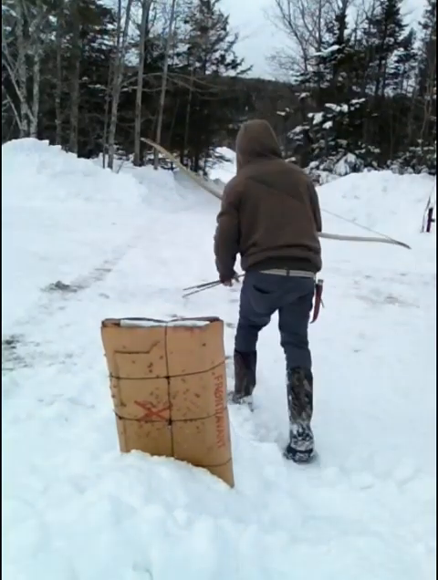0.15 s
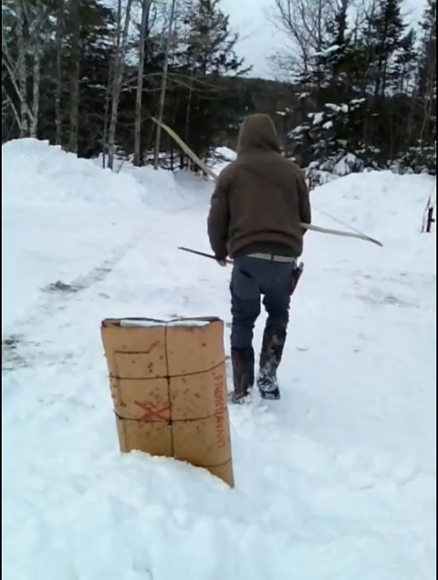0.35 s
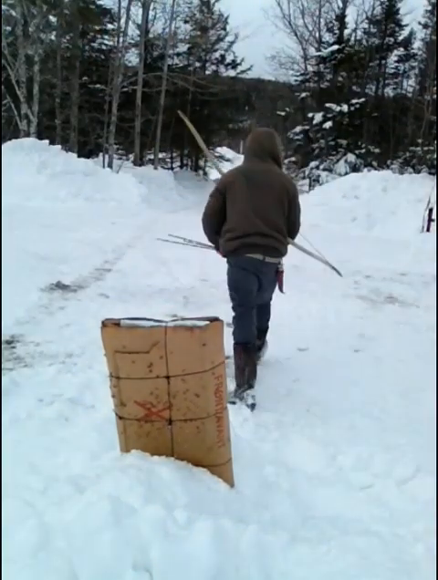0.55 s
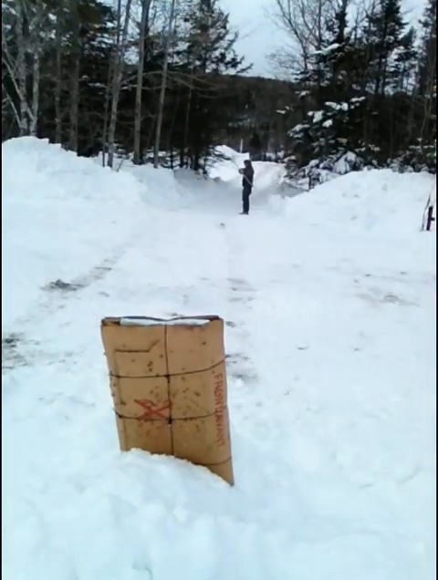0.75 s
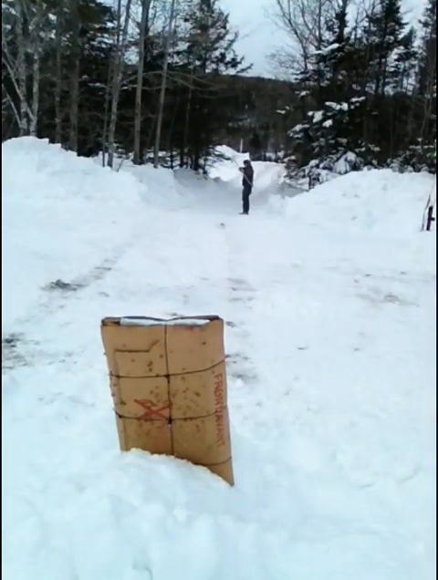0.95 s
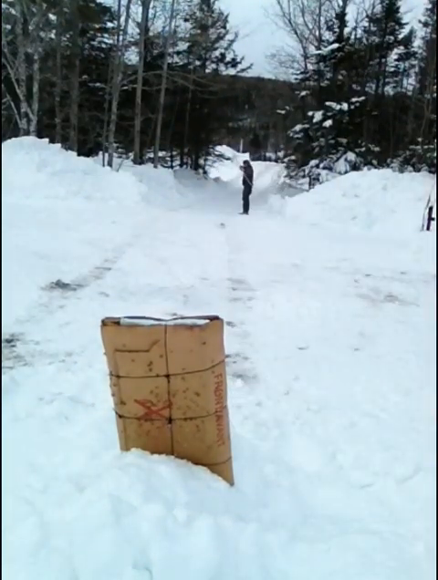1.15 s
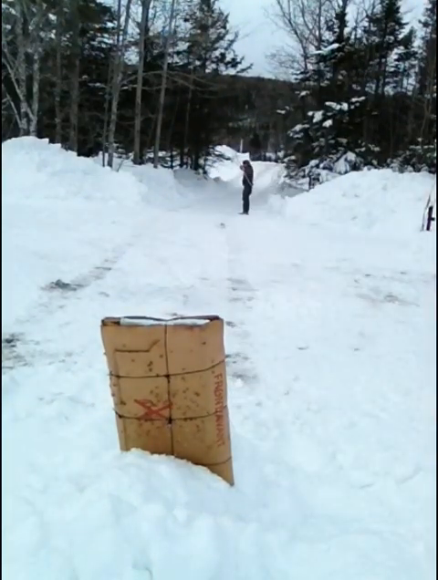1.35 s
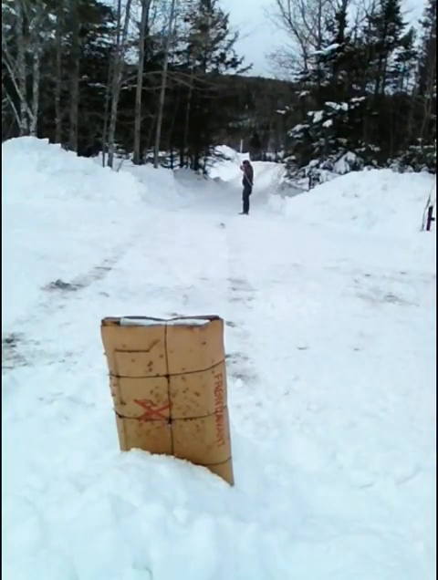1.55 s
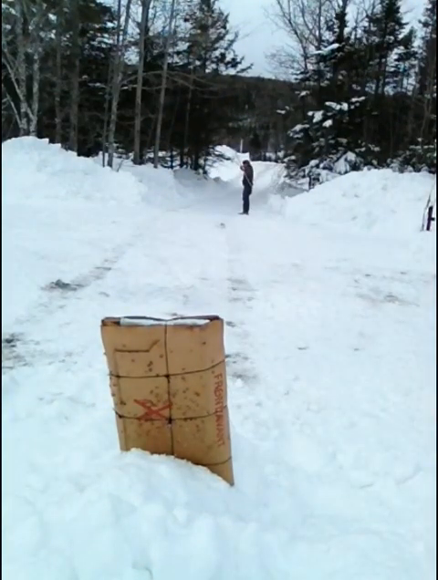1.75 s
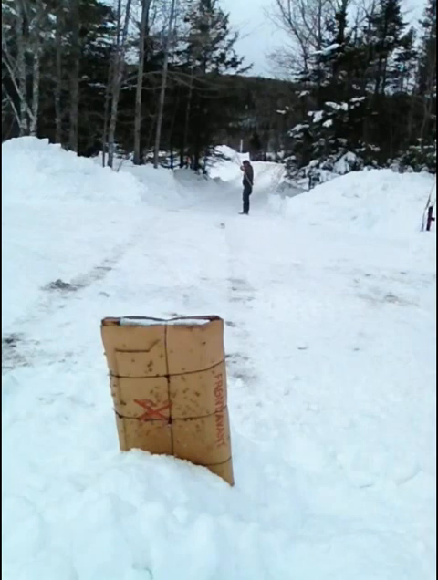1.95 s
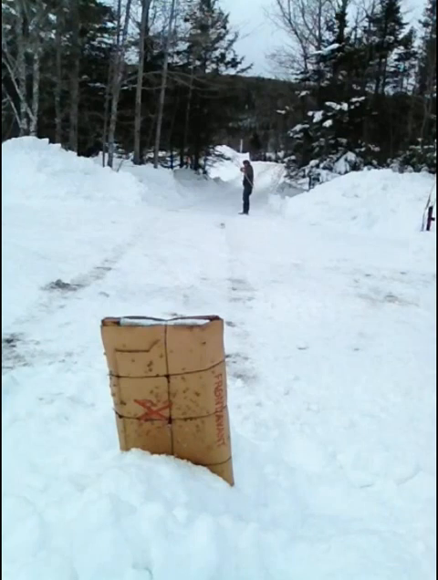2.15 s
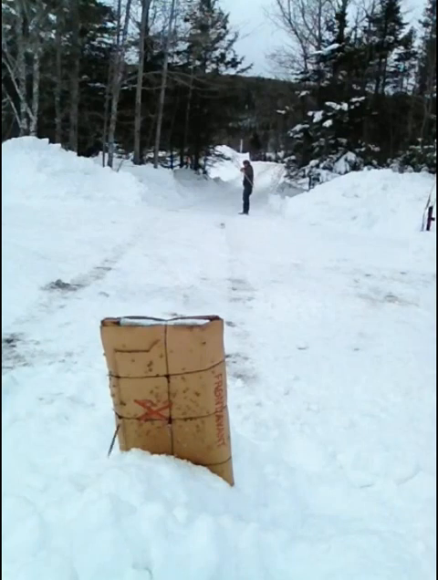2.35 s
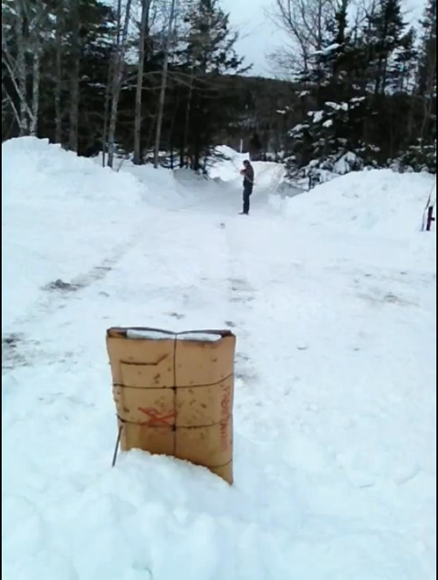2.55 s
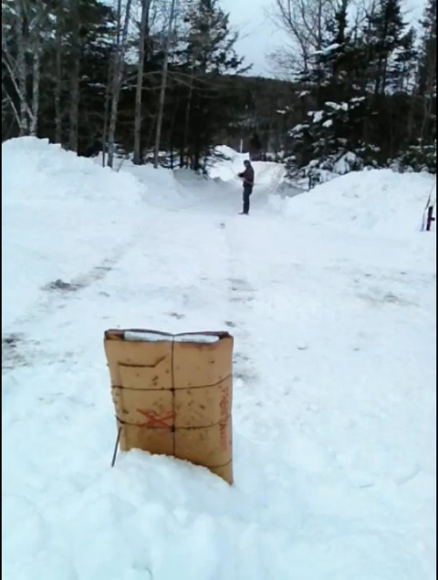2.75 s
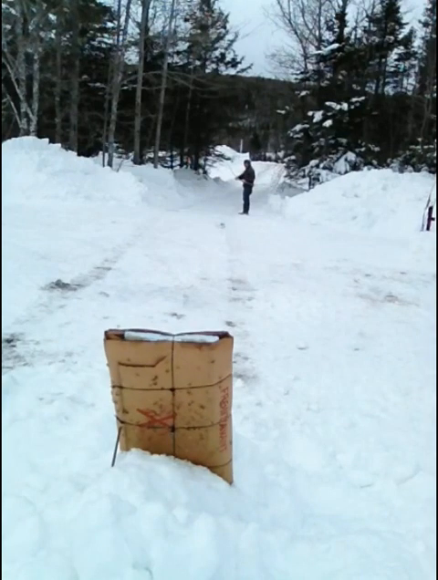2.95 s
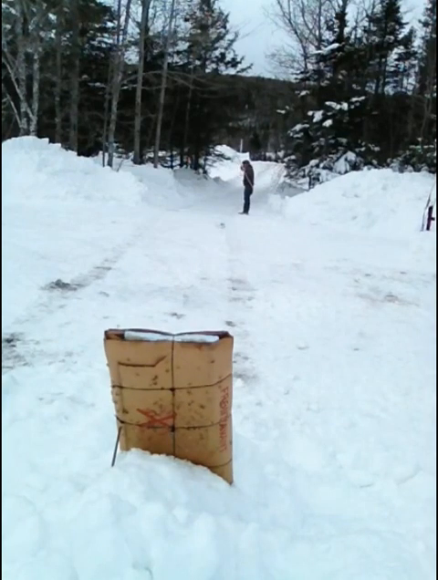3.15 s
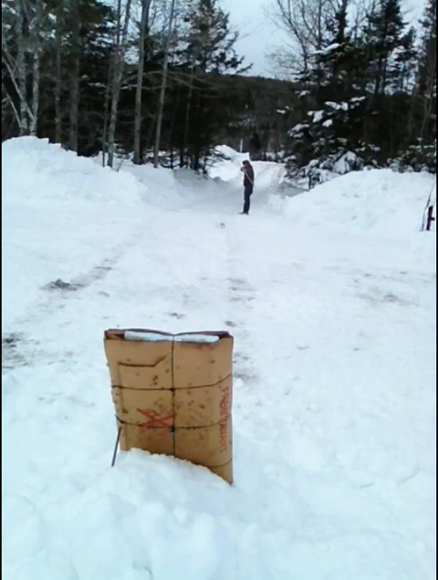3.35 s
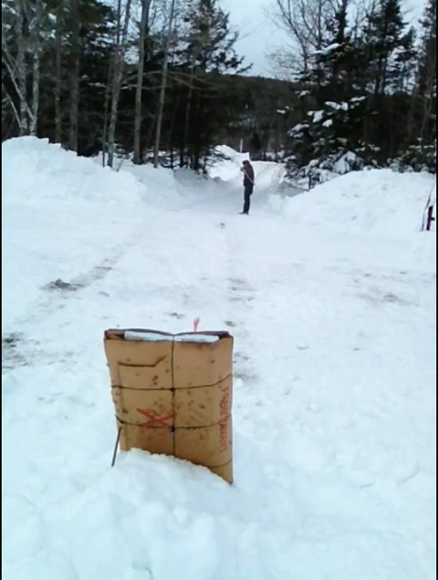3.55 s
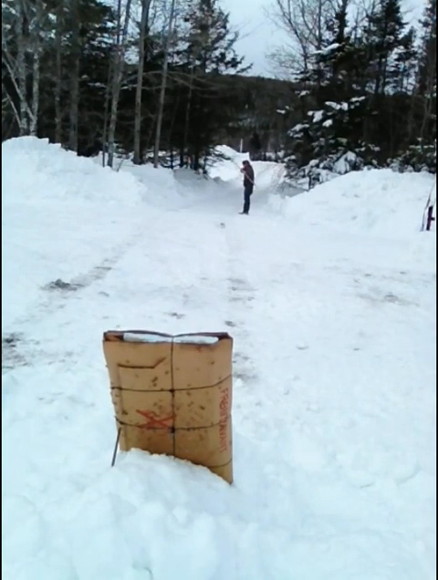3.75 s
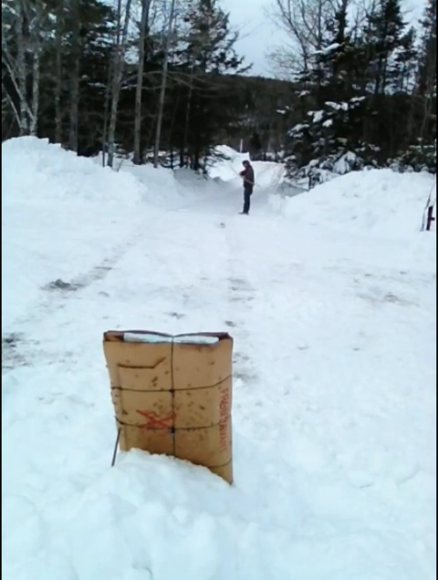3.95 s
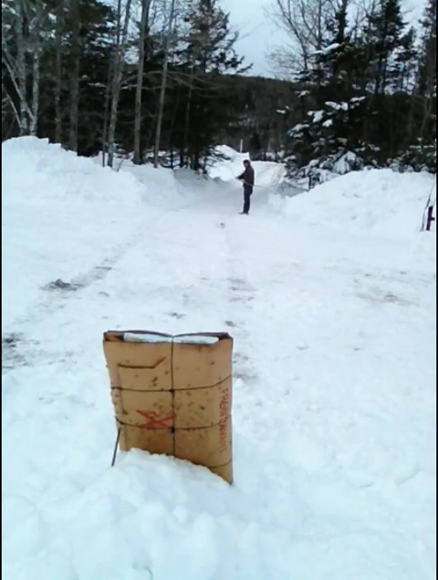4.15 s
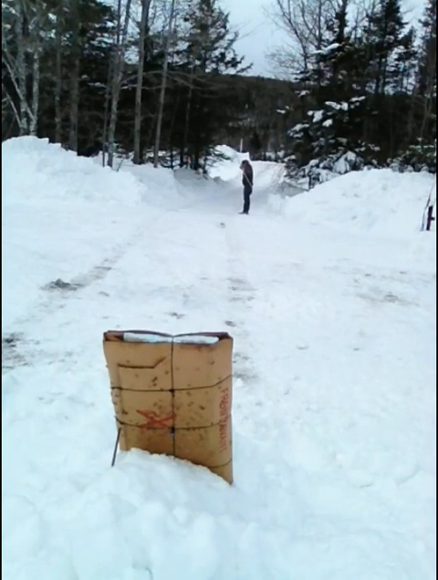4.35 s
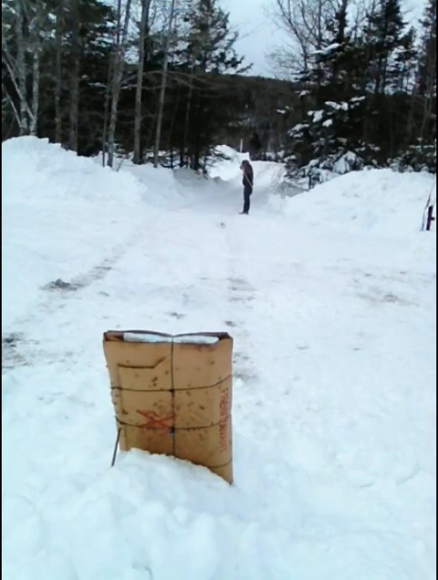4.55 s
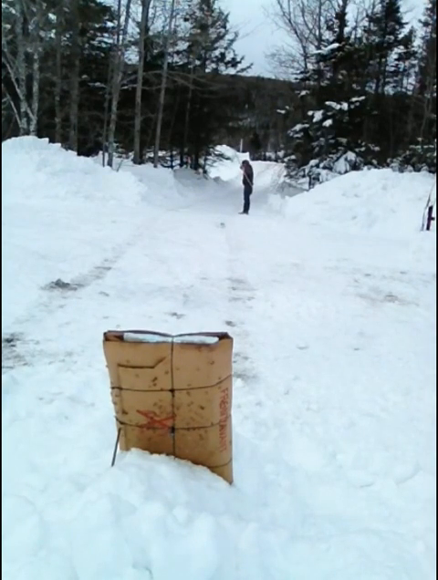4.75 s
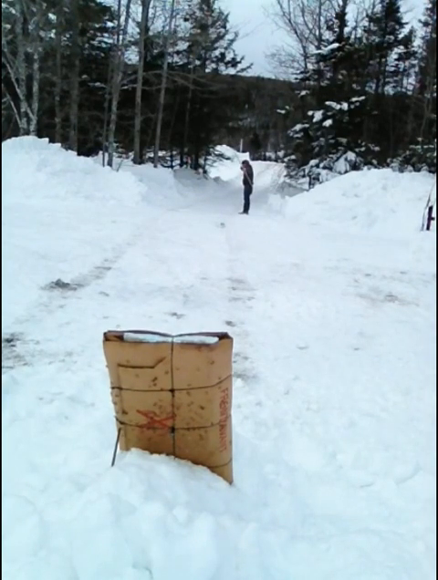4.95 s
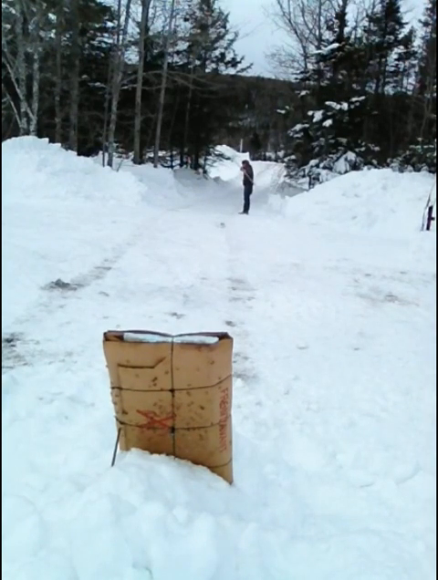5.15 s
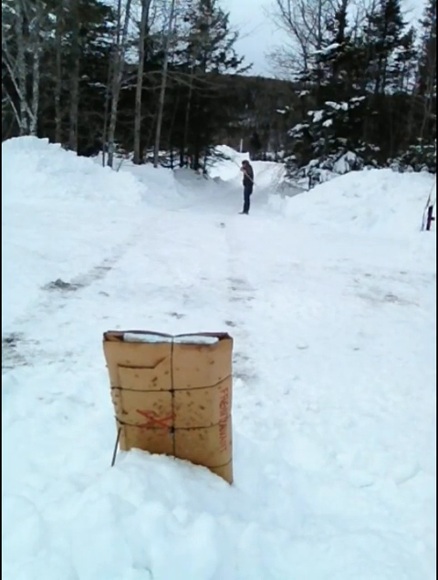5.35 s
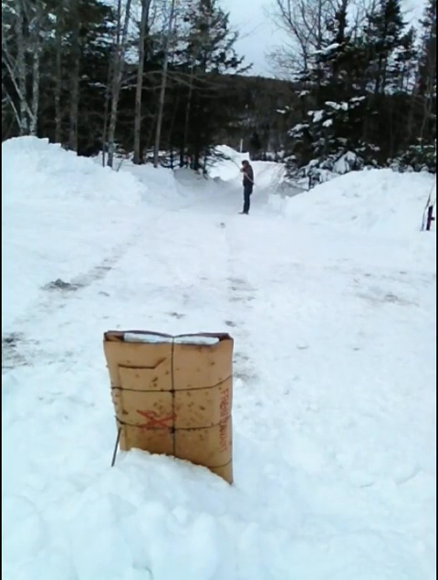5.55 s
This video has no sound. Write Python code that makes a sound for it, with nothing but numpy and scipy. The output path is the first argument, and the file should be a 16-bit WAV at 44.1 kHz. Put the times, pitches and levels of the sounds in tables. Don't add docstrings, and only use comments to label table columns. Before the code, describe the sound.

A quiet snowy lane, heard by a small microphone right beside a cardboard box target. From 0 to 0.8 s boots crunch away over crusty snow with soft dull thuds, while wooden arrow shafts click lightly at the start. A cut drops to a faint far road drone and thin hiss. At about 2.1 s a distant bowstring snaps softly and hums; feathers hiss briefly nearer, and at 2.46 s the arrow hits with a very loud, sharp, short thwack, tearing card, followed by a few snow crumbs. At 3.1 s the drone jumps up. Another faint snap at 3.34 s leads to a thwack at 3.69 s, then clacking shafts and pattering snow until about 4.25 s. The background dips at 4.33 s. The third release comes at 5.06 s and its thwack at 5.4 s is fuller and woodier, with a small rattle, sliding snow and a faint outdoor echo.

```python
import sys
import numpy as np
from scipy import signal
from scipy.fft import rfft, irfft, next_fast_len
from scipy.io import wavfile
from scipy.ndimage import uniform_filter1d, map_coordinates

SR = 44100
rng = np.random.default_rng(int(sys.argv[2]) if len(sys.argv) > 2 else 0)


def master_out(mix):
    frames = np.transpose(np.atleast_2d(mix))
    ceiling = np.clip(frames, -1, 1)
    pcm = np.round(ceiling * 32767).astype(np.int16)
    wavfile.write(sys.argv[1], SR, pcm)


def natural_amplitude(level_db):
    exponent = np.asarray(level_db, float) / 20
    return 10 ** exponent


N = 246519

# arrival_s, arrival_level_db, swell [dB per s]
FLIGHTS = [
    (2.461, -67.5, 80),
    (3.685, -67, 91.5),
    (5.393, -66.5, 88),
]
# start_s, road_db, hiss_db, road_drift [dB per s], gain_dip_db after the thwack
PARTS = [
    (0, -65, -72, 4, -0.5),
    (.785, -65.5, -76, 0.26, -5.5),
    (3.115, -61.5, -75.5, -1.5, -0.13),
    (4.33, -65.5, -75.5, 0.5, -1),
]
# pitch_hz, level_db [dB per Hz]
PUSH_COLOUR = [(300, -2), (1200, 1.5), (2500, -15.5), (5000, -23.5), (9000, -39.5)]
QUIET_TOP_HZ = 15350


def unit(x):
    return x / np.sqrt(np.mean(x ** 2) + 1e-20)


def along(points, hz):
    f, v = np.transpose(points)
    return np.interp(np.log(hz + 1), np.log(f + 1), v)


def wobble(rate):
    knots = rng.standard_normal(int(N * rate / SR) + 4)
    return map_coordinates(knots, [np.arange(N) * rate / SR])


def filtered(x, response):
    m = next_fast_len(len(x) + 8192)
    return irfft(rfft(x, m) * response(np.fft.rfftfreq(m, 1 / SR)), m)[:len(x)]


def noise(spectrum, size=N):
    return unit(filtered(rng.standard_normal(size), lambda hz: natural_amplitude(along(spectrum, hz))))


def fade(t60, attack, size):
    t = np.arange(size) / SR
    return (1 - np.exp(-t / attack)) * natural_amplitude(-60 * t / max(t60, .001))


def add(track, s, sound):
    part = track[round(s * SR):][:len(sound)]
    part += sound[:len(part)]


def struck(spectrum):
    c = irfft(np.log(natural_amplitude(along(spectrum, np.fft.rfftfreq(2048, 1 / SR)))))
    c = np.concatenate([c[:1], 2 * c[1:1024], np.zeros(1024)])
    answer = irfft(np.exp(rfft(c)))
    return answer / np.linalg.norm(answer)


def ring(modes, t60, scatter_db, detune=0.03):
    t = np.arange(4096) / SR
    luck = rng.standard_normal((len(modes), 2))
    tones = np.zeros(len(t))
    for (hz, db), (strength, shift) in zip(modes, luck):
        tones += natural_amplitude(db + scatter_db * strength) * np.sin(2 * np.pi * hz * (1 + detune * shift) * t)
    return tones * fade(t60, attack=0.00043, size=len(t))


def burst(centre_hz, octaves, t60, attack):
    band = lambda hz: np.exp(-(np.log2((hz + 1) / centre_hz) / max(octaves, .1)) ** 2)
    return unit(filtered(rng.standard_normal(4096), band)) * fade(t60, attack, size=4096)


def arrows():
    # start_s, blow_db, contact_ms, tear_db, tear_t60_s
    first = [(2.4616, -30, 0.26, -20.5, .008), (2.4617, -9.5, 0.89, -21, 0.0063),
             (2.4624, -10.5, 0.28, -5.5, 0.0045), (2.467, -36, .8, -40, .012),
             (2.4678, -25, 0.53, -42.5, 0.012), (2.477, -40, 0.67, -46.5, 0.0063)]
    second = [(3.6797, -48.5, .4, -48, .016), (3.6818, -38.5, .4, -42.5, 0.016),
              (3.6848, -29, 0.68, -36.5, 0.009), (3.6863, -15.5, 0.77, -20.5, 0.005),
              (3.6869, -15.5, 0.076, -13.5, 0.0063), (3.6875, -40.5, 0.22, -11.5, .006),
              (3.6884, -15.5, 0.21, -25, 0.0053), (3.6881, -6.5, 0.7, -21, 0.0042),
              (3.7021, -29.5, 0.87, -47, .015)]
    third = [(5.386, -45, 0.34, -48, 0.02), (5.388, -32, 0.23, -36, 0.032), (5.39, -33, 0.24, -31, .02),
             (5.3902, -28, 0.21, -37, 0.037), (5.395, -18.5, 1.13, -23, 0.012),
             (5.3963, -7, 0.52, -20, 0.012), (5.3973, -20.5, 0.51, -24, 0.0057),
             (5.3972, -4, 0.9, -24, 0.016), (5.3983, -14, 0.35, -23.5, 0.016),
             (5.4071, -30, 1.1, -52, .012), (5.41, -30, 0.46, -50, .012), (5.4105, -24, 0.55, -51, .01),
             (5.412, -20.5, 0.54, -50, 0.0096), (5.4235, -32.5, 1.5, -54, .02),
             (5.433, -42, 0.41, -54, 0.017)]
    # pitch_hz, width_hz, peak_db
    box_modes = [
        [(45, 72, -8.5), (170, 11, -14.5), (263, 77, -6.5), (571, 29, -14.5), (724, 230, 2), (1190, 330, -6.5),
         (1378, 80, -14), (1620, 470, -11), (2300, 350, -5.5), (2900, 400, -8)],
        [(168, 59, -17), (235, 85, 9), (464, 180, -2), (635, 57, 2.5), (754, 320, -4.5), (970, 50, -13),
         (1316, 280, -3.5), (2080, 390, 6.5)],
        [(144.4, 18.6, -2), (321, 205, 1), (660, 34, -20), (734, 320, -3.5), (1064, 130, -9), (1200, 240, -2.5),
         (1850, 270, -2), (3210, 380, 2)],
    ]
    # pitch_hz, level_db [dB per Hz]
    tear_colours = [
        [(880, -41.5), (1250, -9.5), (1760, -14.5), (2300, -5), (3000, -8.5), (3250, -11.5), (3450, -34),
         (3900, -13), (5600, -18), (6600, -13), (7750, -5), (8700, -19.5), (9550, -4), (10700, -5.5),
         (11400, -22.5), (12200, -14), (13200, -21), (15000, -23.5), (15450, -39), (15900, -24), (16500, -29),
         (17200, -75)],
        [(150, -90.5), (880, -38.5), (1500, -15.5), (2110, -5.5), (2900, -18), (3600, -10), (4300, -9.5),
         (6000, -11), (7770, -20.5), (10200, -16.5), (11300, -26.5), (12200, -15.5), (13500, -27), (15000, -25),
         (15500, -42), (15900, -35.5), (16300, -43), (16700, -80.5)],
        [(150, -78), (500, -22), (880, -13), (1500, -15), (3250, -11), (3590, -15.5), (6560, -18),
         (7180, -24.5), (12100, -27), (14900, -31), (15900, -80)],
    ]
    # crush_db, crush_t60_s, fizz_db, fizz_t60_s, lowest_hz the box radiates
    quivers = [
        (-30, 0.087, -41, 0.063, 40),
        (-17, 0.058, -36.5, 0.069, 211),
        (-29.5, 0.14, -44.5, 0.16, 270),
    ]
    echo_db = -30
    out = np.zeros(N)
    for contacts, modes, tear, quiver in zip([first, second, third], box_modes, tear_colours, quivers):
        start, hit = thwack(contacts, modes, tear, quiver)
        add(out, start, hit)
        echo = filtered(banks(hit), lambda hz: hz < QUIET_TOP_HZ)
        add(out, start, natural_amplitude(echo_db) * echo)
    return out


def thwack(contacts, modes, tear, quiver):
    start, size = contacts[0][0] - .01, SR // 2
    t, blows, rips = np.arange(size) / SR, np.zeros(size), np.zeros(size)
    for s, blow_db, contact_ms, tear_db, t60 in contacts:
        progress = np.clip((t - s + start) / (contact_ms / 1000), 0, 1)
        blows += natural_amplitude(blow_db + 7.5) * np.sin(np.pi * progress) ** 2
        add(rips, s - start, natural_amplitude(tear_db) * rip(tear, t60))
    crush_db, crush_t60, fizz_db, fizz_t60, low_hz = quiver
    hardest = max(contacts, key=lambda row: row[1])[0] - start
    crush = noise(PUSH_COLOUR, size=size) * fade(crush_t60, attack=0.0029, size=size)
    add(blows, hardest, natural_amplitude(crush_db) * crush)
    fizz = filtered(noise(tear, size=size), lambda hz: hz < QUIET_TOP_HZ)
    add(rips, hardest, natural_amplitude(fizz_db) * fizz * fade(fizz_t60, attack=0.0015, size=size))

    def box(f):
        rings = sum(natural_amplitude(db) * 1j * f * w / (c * c - f * f + 1j * f * w) for c, w, db in modes)
        return rings * (1j * f / (low_hz + 1j * f)) ** 2

    return start, filtered(blows, box) + rips


def rip(tear, t60):
    snap_s = .0033
    shape = fade(t60, attack=0.00036, size=2048)
    snap_share = np.clip(snap_s / t60, 0, 1)
    drive = np.sqrt(1 - snap_share) * rng.standard_normal(len(shape)) * shape
    drive[8] += np.sqrt(snap_share) * np.linalg.norm(shape)
    return signal.fftconvolve(drive, struck(tear))


def banks(x):
    # pitch_hz, t60_s
    echo_t60 = [(150, 0.12), (700, 0.23), (2000, .2), (8000, .1), (15000, 0.17)]
    hz, t, z = signal.stft(rng.standard_normal(SR // 2), SR, nperseg=256)
    dying = natural_amplitude(-60 * t / np.abs(along(echo_t60, hz))[:, None])
    tail = signal.istft(z * dying, SR, nperseg=256)[1]
    return signal.fftconvolve(np.pad(x, (60, 0)), tail / np.linalg.norm(tail))


def bow():
    # start_s, snap_db, swish_db, nock_ring_hz
    releases = [
        (2.1064, -45.5, -51, 2510),
        (3.341, -46, -52, 2084),
        (5.061, -49.5, -53, 2065),
    ]
    # delay_s after release, level_db, centre_hz, width [octaves], t60_s
    slaps = [(-.015, -14, 4520, 0.88, 0.048), (-.002, -11.5, 2520, 0.19, 0.031),
             (.005, -2.5, 11480, .5, .011), (.011, -1, 6486, 0.71, 0.01), (0.0158, 3.5, 10000, .6, 0.008),
             (.027, -10.5, 6000, .9, 0.028), (.040, -14, 7000, 1.5, .02)]
    # pitch_hz, level_db [dB per Hz]
    swish_colour = [(180, 7.5), (300, 11), (354, -42), (461, 6.5), (543, 7.5), (769, 0), (2480, 3),
                    (3180, -1.5), (11500, -2.5), (15500, -26.5)]
    # pitch_hz, level_db
    limb_modes = [(1420, -14), (1820, -16), (3830, -17.5), (4460, -9), (5340, -16)]
    lower_hz, upper_hz, hum_db, hum_t60 = 207, 245, -55, 0.41
    upper_db, upper_loss = -1.5, 15
    out, t = np.zeros(N), np.arange(SR // 2) / SR
    for s, snap_db, swish_db, nock_hz in releases:
        for lag, db, centre_hz, octaves, t60 in slaps:
            slap = burst(centre_hz, octaves, t60, attack=0.00017)
            slap += natural_amplitude(-9.5) * ring(limb_modes + [(nock_hz, -10)], t60=0.14, scatter_db=1.0, detune=0.0046)
            add(out, s + lag, natural_amplitude(snap_db + db) * slap)
        swish = filtered(noise(swish_colour, size=len(t)), lambda hz: 1 / np.sqrt(1 + (hz / 6000) ** 2))
        add(out, s, natural_amplitude(swish_db) * swish * fade(0.23, attack=0.0024, size=len(t)))
        hum = np.sin(2 * np.pi * lower_hz * t)
        hum += np.sin(2 * np.pi * upper_hz * t) * natural_amplitude(upper_db - upper_loss * t)
        hum += 0.44 * np.sin(2 * np.pi * 440 * t) * natural_amplitude(-300 * t)
        hum *= fade(hum_t60, attack=0.00076, size=len(t))
        thump = np.sin(2 * np.pi * 65 * t) * fade(0.12, attack=0.0039, size=len(t))
        add(out, s + .002, natural_amplitude(snap_db + 9) * struck(PUSH_COLOUR))
        add(out, s + .001, natural_amplitude(hum_db) * (hum + natural_amplitude(-13) * thump))
    return out


def flight():
    # pitch_hz, level_db [dB per Hz]
    feather_colour = [(1500, -20), (4000, -5.5), (8000, 2), (12000, 3.5), (15500, -2)]
    t = np.arange(N) / SR
    level = sum(natural_amplitude(np.minimum(db + swell * (t - s), db)) * (t < s) for s, db, swell in FLIGHTS)
    return level * noise(feather_colour)


def shafts():
    # start_s, peak_db, knock_db against the peak
    clacks = [(.0074, -44, -28), (.0513, -39, -28), (.0742, -46.5, -23), (.853, -55, -3), (.9926, -56, -22),
              (1.0024, -51.5, -15), (1.0964, -57.5, -10), (3.7744, -54, -10), (3.7824, -52, -12),
              (3.7904, -52, -11), (3.8053, -47, -16), (3.8124, -53, 3), (3.8172, -49.5, 8.5),
              (3.8392, -46, -7), (3.8408, -51.5, 10), (3.8622, -53.5, 14.5), (3.8688, -46, -12),
              (3.9165, -51, -14), (3.9609, -58, -8), (3.9704, -59, 6), (4.0023, -55, -5.5),
              (4.0124, -52, -1), (4.0362, -46, -8), (4.0754, -59, -3), (4.0884, -57, 5), (4.0964, -51, 4),
              (4.132, -55, 7), (4.1554, -56.5, -5.5), (5.4455, -46, 14.5), (5.457, -55.5, 18),
              (5.488, -57, 10)]
    # pitch_hz, level_db
    tick_modes = [(1650, -4), (2750, -3), (3750, -0.5), (4300, -2), (4750, -12.5), (6000, -6.5),
                  (7400, -11)]
    # pitch_hz, level_db
    knock_modes = [(720, 5), (860, 3.5), (1500, -5)]
    out, t60 = np.zeros(N), 0.018
    for s, db, knock_db in clacks:
        tick = ring(tick_modes, t60, scatter_db=4.5)
        knock = ring(knock_modes, 1.6 * t60, scatter_db=0.0)
        add(out, s, natural_amplitude(db - 7.5) * tick + natural_amplitude(db + knock_db - 8) * knock)
    return out


def snow():
    # start_s, hold_s, crunch_db, thud_db, release_t60_s
    boot_steps = [(0, .04, -58.5, -56.5, 0.2), (.15, 0.0069, -62, -51.5, 0.11),
                  (.2, 0.17, -75.5, -61.5, 0.13), (.485, .01, -91, -59, .13), (.58, 0.099, -75, -71, 0.14),
                  (.7, 0.067, -74, -59.5, 0.18)]
    # start_s, hold_s, crunch_db, thud_db, release_t60_s
    sprays = [(2.478, 0.0018, -59, -44.5, 0.029), (2.49, 0.059, -67, -66, 0.21),
              (2.56, 0.11, -75.5, -93, 0.17), (3.703, 0.0019, -47.5, -43, .05),
              (3.715, 0.16, -60, -63, 0.083), (3.89, 0.2, -69.5, -77, 0.32),
              (5.408, 0.0015, -48, -34, 0.065), (5.42, 0.062, -63, -58.5, 0.5)]
    # centre_s, level_db, half_length_s
    puffs = [(0.26, -68.5, .006), (0.332, -65, 0.018), (0.386, -60, 0.011), (.57, -68.5, 0.0065),
             (0.65, -60.5, 0.0095), (0.718, -65, 0.023)]
    # start_s, peak_db, centre_hz, thud_db against the peak
    crust = [(.0074, -42, 3700, -5), (.0285, -45.5, 3740, 5.5), (0.037, -48, 3000, 3.5),
             (.108, -54.5, 5000, 4), (.0508, -45, 4240, -26), (.132, -53, 12900, -7),
             (0.1513, -43, 2000, -9), (.161, -38.5, 2590, -8), (0.1617, -50.5, 6500, -22),
             (0.1695, -47, 3180, 1), (0.2392, -59.5, 2020, 18.5), (.246, -64, 1500, 20),
             (.324, -56, 2680, -5), (.345, -54, 4540, -1), (.3843, -52, 2080, -9), (.4704, -57, 8370, -21),
             (0.4912, -48.5, 9800, 3), (0.569, -57, 4000, 6), (.61, -51, 12200, -25),
             (0.6417, -54, 3510, -11), (0.6545, -55, 2580, 3), (.7228, -52, 6500, -20),
             (0.7228, -56, 2000, 7), (0.7491, -56, 4000, 4), (.7674, -51, 2680, 11.5)]
    # start_s, peak_db, centre_hz
    crumbs = [(2.487, -44.5, 3320), (2.5134, -46, 7000), (2.5538, -55, 6000), (3.7116, -52, 2000),
              (3.721, -51, 2470), (3.7377, -45, 2050), (3.76, -51, 4200), (3.8498, -50, 4000),
              (3.8652, -45, 6500), (3.885, -47, 3520), (3.894, -54, 2050), (3.928, -48.5, 2750),
              (3.972, -57.5, 2550), (4.0274, -48, 2840), (4.036, -55, 4260), (4.0539, -50, 2240),
              (4.2146, -63, 6500), (4.257, -45, 3600), (4.2636, -46.5, 3400)]
    # pitch_hz, level_db [dB per Hz]
    crunch_colour = [(590, -8), (1000, -6), (1490, -5.5), (3110, -8.5), (3450, -8), (3780, -7),
                     (5040, -11.5), (12600, -10.5), (15500, -17)]
    skid_colour = [(590, -33), (1000, -2), (1200, -7), (2840, -11), (3080, -13.5), (4540, -12), (4980, -19),
                   (14600, -20.5), (15500, -29)]
    thud_colour = [(35, -80), (60, -44), (110, -10.5), (200, 0), (350, -7.5), (700, -10.5), (1500, -40)]
    crust_octaves, crumb_octaves, crumb_thud_db = 0.82, 1.4, -12.5
    push_db = 11.5
    push = unit(noise(thud_colour) * natural_amplitude(3 * wobble(25)))
    out, t = np.zeros(N), np.arange(N) / SR
    walking = (boot_steps, crunch_colour, 0.0075, PARTS[1][0])
    landing = (sprays, skid_colour, 0.0022, N / SR)
    for rows, colour, rise, end in [walking, landing]:
        grains = rng.standard_normal(N) * natural_amplitude(1.2 * wobble(90) + 4 * wobble(600))
        crunch = unit(filtered(grains, lambda hz: natural_amplitude(along(colour, hz))))
        for s, hold, crunch_db, thud_db, t60 in rows:
            pressed = natural_amplitude(crunch_db) * crunch + natural_amplitude(thud_db - 4.0) * push
            out += (t < end) * press(s, rise, hold, t60) * pressed
    out += noise(crunch_colour) * sum(natural_amplitude(db) * np.exp(-((t - s) / half) ** 2) for s, db, half in puffs)
    cracks = [(*row, crust_octaves) for row in crust]
    cracks += [(*row, crumb_thud_db, crumb_octaves) for row in crumbs]
    knock = np.pad(struck(thud_colour), (0, 2048))
    for s, db, centre_hz, thud_db, octaves in cracks:
        crack = burst(centre_hz, octaves, t60=0.014, attack=0.00038)
        add(out, s, natural_amplitude(db - 5.5) * crack + natural_amplitude(db + thud_db + push_db) * knock)
    return out


def press(s, rise, hold, t60):
    t = np.arange(N) / SR - s
    return np.clip(t / rise, 0, 1) * natural_amplitude(-60 * np.clip(t - rise - hold, 0, None) / max(t60, .001))


def air():
    # pitch_hz, level_db [dB per Hz]
    road_colours = [
        [(60, -46), (106, -9.5), (464, -10), (771, 0), (1460, -11.5), (1690, -20.5), (3000, -27.5),
         (6600, -120)],
        [(50, -40), (110, -18), (215, -14.5), (560, -10.5), (771, -4.5), (1400, -14), (2300, -30.5),
         (6600, -88)],
        [(60, -58), (106, -14), (565, -10.5), (823, -4), (1090, -14), (1370, -13.5), (3000, -34.5),
         (6600, -120)],
    ]
    road_changes = [0, 3.115, 4.33, 6]
    # pitch_hz, level_db [dB per Hz]
    hiss_colour = [(880, -33), (1500, -6.5), (1700, -11.5), (1790, -9), (2110, -10.5), (4350, -10),
                   (10100, -17), (14200, -12), (15500, -22)]
    road_db, hiss_db = levels()
    t, drone = np.arange(N) / SR, np.zeros(N)
    for colour, begin, end in zip(road_colours, road_changes, road_changes[1:]):
        drone += noise(colour) * (t >= begin) * (t < end)
    z = signal.stft(drone, nperseg=1024)[2]
    patches = uniform_filter1d(rng.standard_normal(z.shape), size=5, axis=0)
    patches = uniform_filter1d(patches, size=8, axis=1)
    road = unit(signal.istft(z * natural_amplitude(1.2 * unit(patches)), nperseg=1024)[1][:N])
    return natural_amplitude(road_db + 0.53 * wobble(4.7)) * road + notes() + natural_amplitude(hiss_db) * noise(hiss_colour)


def levels():
    t = np.arange(N) / SR
    starts, road_db, hiss_db, drift, dip_db = np.transpose(PARTS)
    part = np.clip(np.searchsorted(starts, t, side="right") - 1, 0, None)
    landed = np.array([0] + [row[0] for row in FLIGHTS])[part]
    since = np.clip(t - landed, 0, None)
    dip = lambda lag_s: dip_db[part] * (1 - np.exp(-(since / lag_s) ** 2))
    road = road_db[part] + drift[part] * (t - starts[part]) + dip(0.068)
    return road, hiss_db[part] + dip(0.3)


def notes():
    # start_s, end_s, pitch_hz, level_db
    engines = [(3.115, 4.33, 757, -69), (3.3, 4.33, 803, -70), (3.9, 4.2, 851, -73), (4.7, 5.6, 760, -73),
               (4.58, 5.6, 437, -73)]
    fade_s = 0.023
    t, out = np.arange(N) / SR, np.zeros(N)
    for begin, end, hz, db in engines:
        gate = np.clip(np.minimum(t - begin, end - t) / fade_s, 0, 1)
        level = natural_amplitude(db + 3.2 * wobble(7.9))
        turns = np.cumsum(hz + 1.5 * wobble(9)) / SR
        out += gate * level * np.sin(2 * np.pi * turns)
    return out


def pops():
    # centre_s, level_db
    bumps = [(0.784, -60), (3.115, -72)]
    t = np.arange(N) / SR
    return sum(natural_amplitude(db) * np.exp(-((t - s) / 0.0035) ** 2) for s, db in bumps)


def scene():
    quiet = air() + pops() + snow() + shafts() + bow() + flight()
    return (filtered(quiet, lambda hz: hz < QUIET_TOP_HZ) + arrows())[None]


def band_limit(x):
    return signal.sosfilt(signal.butter(12, 17010, fs=SR, output="sos"), x)


def record(dry):
    top_hz, edge_hz = 16850, 300

    def microphone(hz):
        bass_loss = (1j * hz / (90 + 1j * hz)) ** 2
        return bass_loss * np.exp(-(np.maximum(hz - top_hz + edge_hz, 0) / edge_hz) ** 2)

    mix = filtered(dry[0], microphone)[None]
    return band_limit(mix)


dry = scene()
out = record(dry)
master_out(out)
```